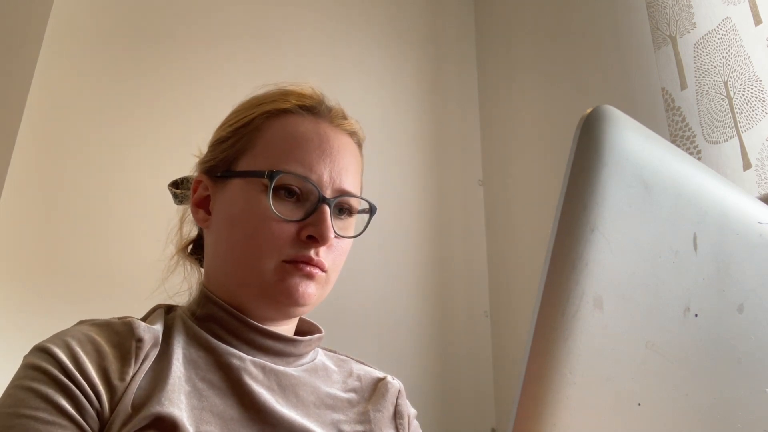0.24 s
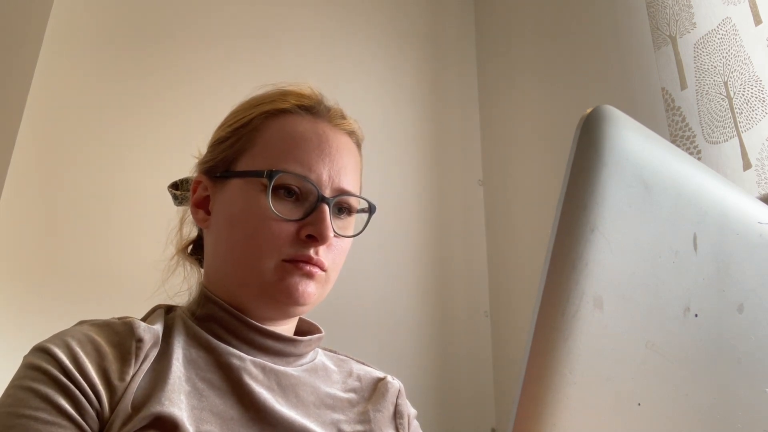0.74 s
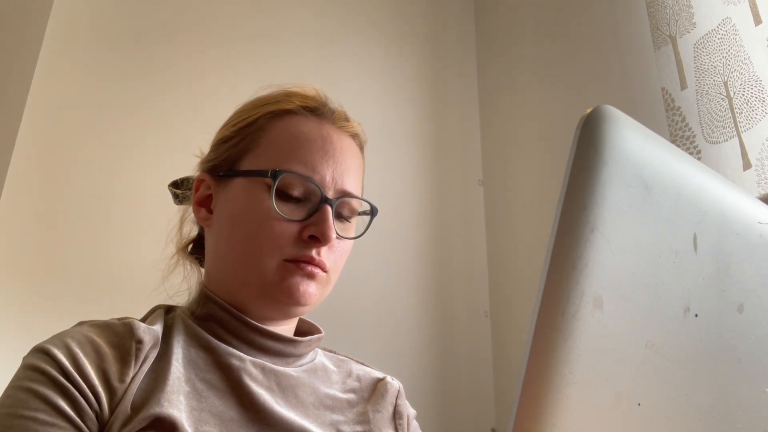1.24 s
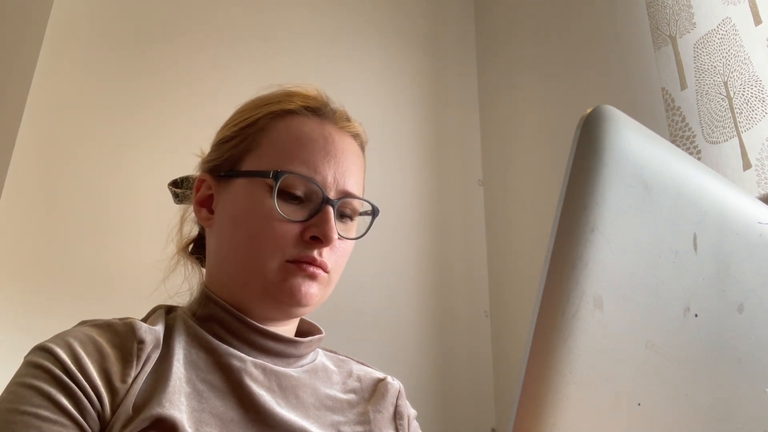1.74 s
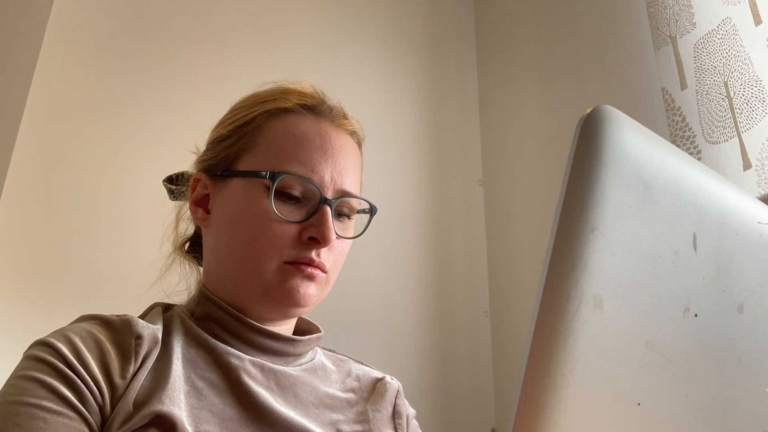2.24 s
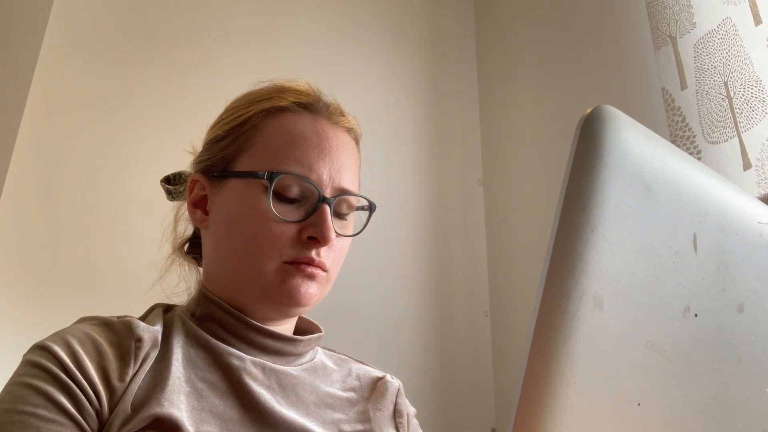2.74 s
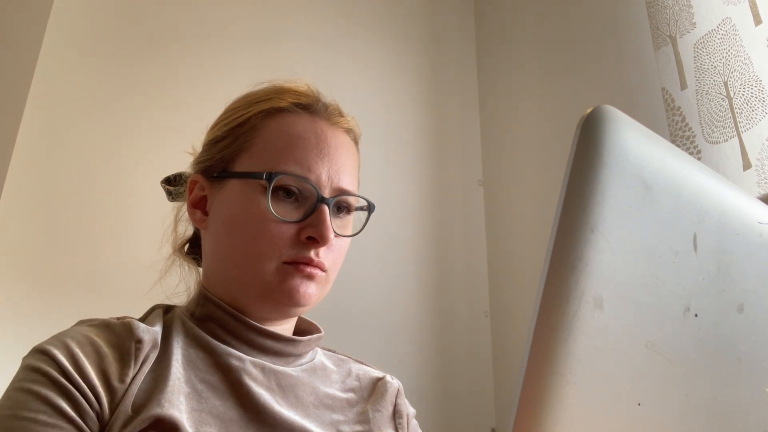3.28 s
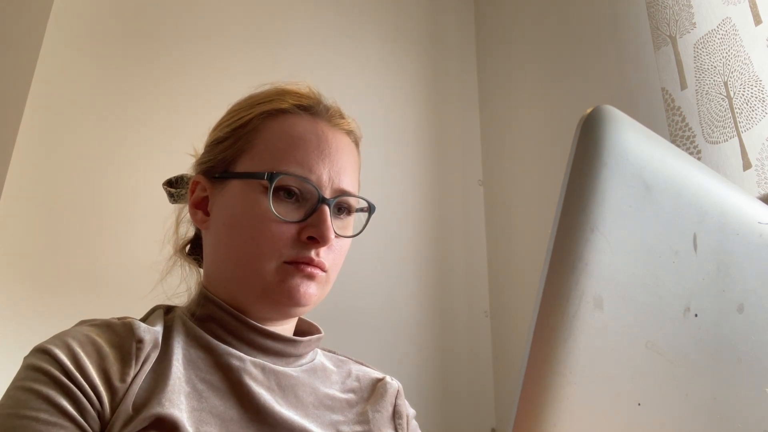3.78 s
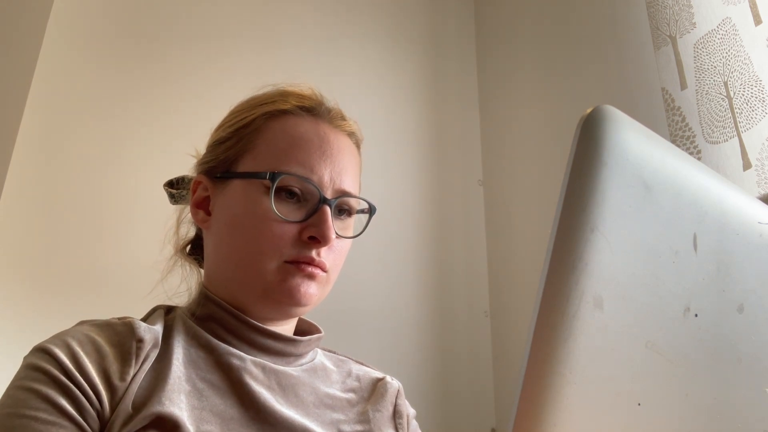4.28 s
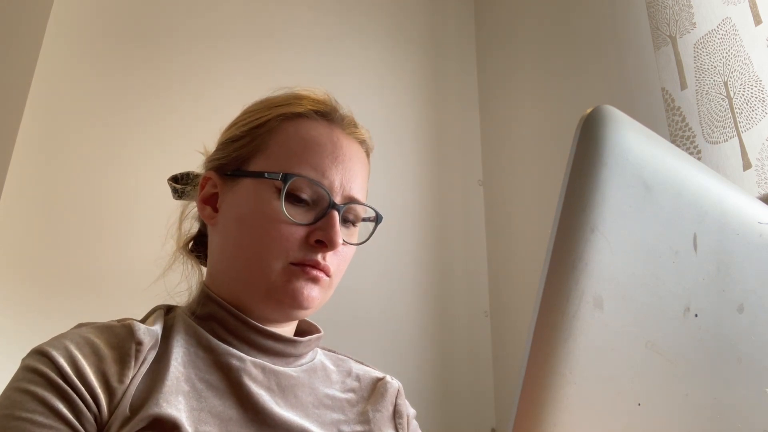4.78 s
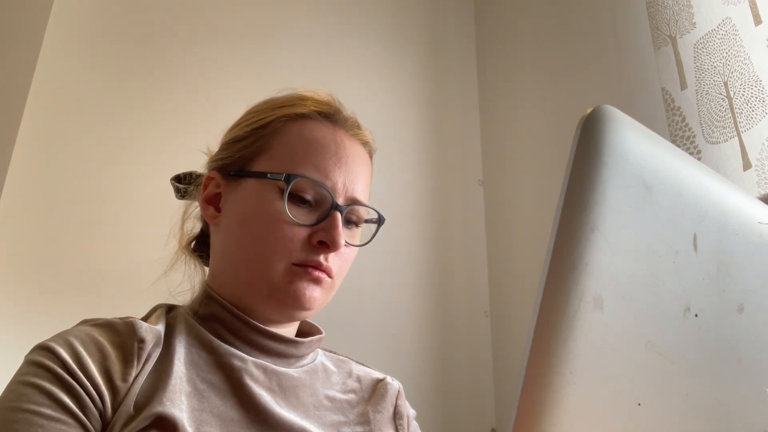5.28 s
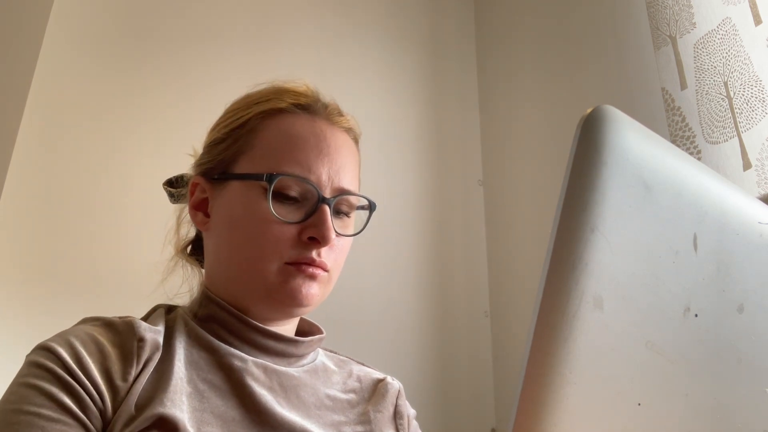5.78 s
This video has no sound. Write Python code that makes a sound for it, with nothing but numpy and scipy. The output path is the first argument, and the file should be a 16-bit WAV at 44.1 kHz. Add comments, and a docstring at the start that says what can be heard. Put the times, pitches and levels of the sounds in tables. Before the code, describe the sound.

A small quiet room with faint low air noise, heard close and in mono. From the start, light crisp laptop key clicks run quickly, about twelve to fifteen a second, uneven in strength. Around 1.05 s there is a small gap, then firmer, more spaced clicks from 1.3 s, with a sharper stroke and brief rattle at 1.93 s and a tight hollow-sounding flurry until 2.5 s. Typing pauses, leaving only room air and slight hand rumble, until about 3.2 s. A lighter, regular run follows to 4.3 s. A short finger scuff at 4.4 s leads to the loudest moment: hard strokes thudding the case at 4.65 and 4.74 s, another with a rattle at 4.93 s. Softer sparse clicks follow, then scuffs near 5.6 s, a firm stroke at 5.7 s and quick clicks to the end at 6 s.

```python
"""In a small quiet room, quick runs of typing on a laptop, with a pause and a few hard strokes.
Each click is a short noise burst filtered by the resonances of its cap, then reflections and a diffuse tail.
Keys meeting their stops excite decaying case modes, most strongly in the hard strokes; soft bumps swing low.
Loose caps rattle and fingers scuff as unevenly modulated noise; moving hands rumble under still room air."""
import sys
import numpy as np
from scipy import signal
from scipy.fft import rfft, irfft, next_fast_len
from scipy.io import wavfile

SR = 44100
rng = np.random.default_rng(int(sys.argv[2]) if len(sys.argv) > 2 else 0)


def generate_wav(signal):
    """Clip the signal to [-1, 1] and save it as 16-bit WAV at the path in sys.argv[1]."""
    frames = np.transpose(np.atleast_2d(signal))
    scaled = np.clip(frames, -1, 1) * 32767
    pcm = np.round(scaled).astype(np.int16)
    wavfile.write(sys.argv[1], SR, pcm)


N = 265461   # samples in the scene
LENGTH = 12288   # samples in one impact
AGE = np.arange(LENGTH) / SR   # s since the impact began

# key clicks, levels relative:
# start_s, level_db, hollow_knock_db, top_end_db, cap_ring_hz, deck_thud_db, contact_decay_s
KEY_CLICKS = [(0.0004, -28.5, -20.5, -24, 6780, -48.5, 0.0013), (0.0588, -30.5, -14, -26, 4430, -56, 0.003),
              (0.174, -33, -26, -20.5, 6100, -60, 0.0016), (0.2272, -30.5, -26, -25, 5800, -57, 0.0015),
              (0.2887, -32, -13, -17, 4500, -37, 0.0025), (0.3757, -26.5, -22, -27, 6570, -42.5, 0.0026),
              (0.5229, -26, -20.5, -24, 6670, -42, 0.0018), (0.5935, -34.5, -9.5, -28, 4400, -50, 0.0023),
              (0.6695, -25.5, -29, -23.5, 6820, -41.5, 0.0022), (0.7421, -32, -6, -19, 5830, -42, 0.0041),
              (0.819, -24.5, -19, -18, 6800, -32, 0.0012), (0.877, -33, -36, -18, 6900, -46, 0.0018),
              (0.8973, -29, -9, -15.5, 4600, -56, 0.0018), (0.9858, -23.5, -21.5, -28, 6530, -45, 0.0018),
              (1.036, -35, -30, -18, 6300, -51, 0.0012), (1.0519, -28, -7, -23, 6330, -45, 0.0025),
              (1.311, -22.5, -23, -16.5, 5470, -33, 0.00088),
              (1.4136, -20.5, -21, -13.5, 6470, -45, 0.0047), (1.585, -32, -29, -24, 4580, -44, 0.00092),
              (1.7217, -26, -36, -18.5, 7520, -38, 0.0016), (1.8152, -38.5, -11, -25, 8000, -44, 0.002),
              (1.9274, -20.5, -8.5, -16, 5880, -32, 0.0018), (2.021, -27.5, -12.5, -10, 5500, -44, 0.0029),
              (2.045, -29, -5.5, -11, 6400, -51, 0.0024), (2.0869, -30, -7.5, -19, 3900, -42, 0.0018),
              (2.2093, -29.5, -5, -13.5, 4330, -57, 0.0012), (2.2935, -38, -8, -25, 7600, -51, 0.0027),
              (2.3526, -22.5, -6, -18, 5500, -34, 0.0018), (2.4672, -41.5, -10, -17, 5740, -48, 0.0023),
              (2.4775, -36.5, -13, -31, 6040, -48, 0.0024), (3.1996, -46, -10, -24, 6840, -61, 0.0018),
              (3.2788, -24, -18, -19, 4750, -47, 0.001), (3.3364, -28, -26, -24, 4160, -51.5, 0.0018),
              (3.4055, -30, -15.5, -20, 4550, -57, 0.0013), (3.457, -24, -19, -26, 6350, -59, 0.0014),
              (3.4861, -27, -20, -20.5, 6730, -55, 0.0012), (3.5588, -27.5, -12.5, -22, 7270, -46, 0.0016),
              (3.6268, -31, -24, -23, 6750, -53, 0.0016), (3.7115, -30.5, -16.5, -25, 4350, -63, 0.002),
              (3.7743, -33.5, -32, -29, 6750, -45, 0.0015), (3.8467, -28.5, -15.5, -19, 4260, -58, 0.002),
              (3.922, -33, -26, -23, 4140, -50.5, 0.0014), (3.9966, -27.5, -13, -20.5, 5900, -56, 0.0021),
              (4.0307, -40, -24, -18, 4430, -72, 0.0018), (4.0982, -27, -21.5, -21, 4500, -66, 0.0024),
              (4.2107, -32, -37, -15.5, 4210, -49, 0.0013), (4.2949, -29.5, -12, -22, 4280, -47, 0.0029),
              (4.4476, -23.5, -15.5, -12, 5550, -46.5, 0.001), (4.5284, -25.5, -19, -17, 5560, -45, 0.0016),
              (4.6506, -32, 1, -25, 4140, -28, 0.0024), (4.6592, -27, -2, -22, 4330, -22, 0.0018),
              (4.7363, -27.5, 1.5, -31, 4640, -26, 0.0015), (4.8435, -36.5, -14, -10, 7830, -44, 0.0018),
              (4.9275, -22, -8, -12, 5620, -27, 0.0016), (4.986, -34.5, -18, -18, 5450, -42.5, 0.0021),
              (5.1595, -46.5, -13, -13, 6150, -51, 0.0025), (5.2609, -31, -9, -16, 4190, -45, 0.0011),
              (5.3588, -47.5, -3.5, -16, 7910, -65, 0.0018), (5.457, -35.5, -30, -20, 3900, -49.5, 0.0021),
              (5.5033, -36, -13, -43, 6640, -46, 0.0018), (5.5668, -33, -14, -39, 4480, -42, 0.0011),
              (5.6516, -29.5, -10.5, -23, 6100, -44, 0.0022), (5.6971, -23, -4.5, -22, 7530, -35, 0.0023),
              (5.7878, -31, -8, -27, 7300, -44, 0.0029), (5.842, -34.5, -11, -19, 6900, -55, 0.0015),
              (5.899, -28.5, -16.5, -21, 4510, -48, 0.0014), (5.9227, -27.5, -23, -28, 4550, -51, 0.0018),
              (5.9973, -37.5, -0.5, -40, 4440, -46, 0.0033)]
# hard strokes that shake the case, levels relative:
# start_s, level_db, bass_db, deck_knock_db, strongest_mode_hz, deck_pitch_hz
HARD_STROKES = [(1.723, -26.5, -11, -20.5, 241, 1010), (1.9274, -20, -30, -10, 380, 1070),
                (2.353, -20.5, -15, -10, 415, 990), (4.608, -26.5, -26, -41, 417, 1380),
                (4.653, -19.5, -28, -7.5, 485, 1170), (4.6612, -11.5, -24, -4, 260, 1266),
                (4.737, -13, -21, -3.5, 264, 1266), (4.9346, -15.5, -12, 0.5, 250, 1305),
                (5.506, -37.5, -6, 3.5, 490, 1290), (5.699, -23, -12, -4.5, 386, 1020),
                (5.793, -33.5, -26, 3.5, 394, 1160), (5.923, -29, -9, -15, 250, 1320)]
# relative spectrum of a key contact: frequency_hz, level_db
CLICK_SPECTRUM = [(150, -41), (450, -4), (800, -7), (1400, -1.5), (2100, -7), (3100, -8.5), (4400, -2.5),
                  (5000, -3.5), (6500, -3), (8000, -4.5), (10000, -8.5), (12000, -12.5), (14000, -11),
                  (16000, -17)]


def from_db(db):
    """Amplitude ratio: 20 dB is a factor of ten."""
    return 10 ** (np.asarray(db) / 20)


def unit(x):
    """Normalisation: the sum of squares, the signal energy, becomes one."""
    return x / np.sqrt(np.sum(x ** 2) + 1e-20)


def at_hz(points, hz):
    """Spectral interpolation: levels in dB run straight between points on a log-frequency axis."""
    point_hz, point_db = np.transpose(points)
    return np.interp(np.log(hz + 1), np.log(point_hz), point_db)


def colour(x, db_at):
    """Minimum-phase filtering: folding the cepstrum makes a causal filter of gain db_at(Hz)."""
    size = 2 * next_fast_len(len(x) // 2 + 2048)
    bin_hz = np.arange(size // 2 + 1) * SR / size
    cepstrum = irfft(np.log(from_db(db_at(bin_hz))))
    cepstrum[1:size // 2] *= 2
    cepstrum[size // 2 + 1:] = 0
    response = np.exp(rfft(cepstrum))
    return irfft(rfft(x, size) * response)[:len(x)]


def noise(spectrum):
    """Stationary noise: filtered white noise of the given spectral shape, rms one."""
    white = rng.standard_normal(N)
    return unit(colour(white, lambda hz: at_hz(spectrum, hz))) * np.sqrt(N)


def burst(decay_s, rise_s, uneven=0):
    """Impact noise: a swarm of tiny impacts swells and decays, a few standing out if uneven; energy one."""
    impacts = rng.standard_normal(LENGTH)
    impacts *= np.abs(impacts) ** max(uneven, 0)
    swell = 1 - np.exp(-AGE / rise_s)
    return unit(impacts * np.exp(-AGE / max(decay_s, 1e-4)) * swell)


def resonate(x, hz, width_hz):
    """Damped resonance: a pole pair sets pitch and bandwidth, with gain one at the peak."""
    radius = np.exp(-np.pi * width_hz / SR)
    zeros = np.array([1, 0, -1]) * (1 - radius * radius) / 2
    poles = [1, -2 * radius * np.cos(2 * np.pi * hz / SR), radius * radius]
    return signal.lfilter(zeros, poles, x)


def add(track, s, sound):
    """Superposition: pressures add from time s, cut at the ends of the track."""
    at = round(s * SR)
    sound, at = sound[max(-at, 0):], max(at, 0)
    part = sound[:max(len(track) - at, 0)]
    track[at:at + len(part)] += part


def room_tail(t60, rise_s):
    """Diffuse reverberation: freshly drawn noise falls by 60 dB in t60 seconds."""
    return burst(t60 / np.log(1000), rise_s)


def grit(per_s, size_db):
    """Contact roughness: random strengths, per_s a second, joined into an uneven gain of rms one."""
    t = np.arange(N) / SR
    sizes = from_db(size_db * rng.standard_normal(LENGTH * 2))
    return unit(np.interp(t * per_s, np.arange(len(sizes)), sizes)) * np.sqrt(N)


def still_air(level_db=-57.5):
    """Background noise: the still air of the room is a steady random pressure."""
    # relative spectrum of the room air: frequency_hz, level_db
    air_spectrum = [(25, -19), (55, -14), (75, -2), (115, -5), (170, -8), (280, -10), (400, -16),
                    (550, -21), (900, -25.5), (2000, -29.5), (4000, -30.5), (9000, -33.5), (14800, -35),
                    (16000, -35.5)]
    return from_db(level_db) * noise(air_spectrum)


def hands(level_db=0.0, rest_db=-55.0, fade=0.69, most_db=-47.5, push_db=-14.0, push_s=0.017):
    """Structure-borne excitation: moving hands shake laptop and desk in lumps; each click adds a push."""
    # effort of hands working on the deck, before fading and ceiling: time_s, effort_db
    work = [(0.0, -59), (0.69, -53), (0.89, -54.5), (1.41, -54.5), (1.94, -47.5), (2.21, -53), (2.55, -56),
            (2.88, -63), (3.13, -59.5), (3.49, -54.5), (3.75, -68), (4.22, -59), (4.83, -44), (5.0, -54.5),
            (5.26, -59.5), (5.52, -56), (5.7, -37), (6.02, -54)]
    # relative spectrum of the rumble: frequency_hz, level_db
    rumble_spectrum = [(20, -45), (35, -23.5), (68, -2), (100, -6.5), (125, -6), (160, -1.5), (205, 2.5),
                       (280, -3), (390, -4.5), (490, -10), (700, -19.5), (1000, -25), (1400, -37.5),
                       (2200, -47)]
    s, db = np.transpose(work)
    effort_db = np.interp(np.arange(N) / SR, s, db)
    # below rest_db the rumble falls faster than the effort
    fade_db = fade * np.minimum(effort_db - rest_db, 0)
    level = from_db(np.minimum(level_db + effort_db + fade_db, most_db))
    pushes = np.zeros(N)
    for key_s, key_db, *_ in KEY_CLICKS:
        push = AGE / push_s * np.exp(-AGE / push_s)
        add(pushes, key_s, from_db(min(key_db, -30) + push_db) * push)
    # independent contributions add in power
    return np.hypot(level, pushes) * noise(rumble_spectrum) * grit(per_s=24, size_db=5.0)


def keycap(x, ring_hz, count=7, spread=0.56, width_hz=110):
    """Modal resonance: cap and scissor clip have a few narrow modes, different from click to click."""
    pitches = np.clip(ring_hz * np.exp(spread * rng.standard_normal(count)), 1500, 15000)
    return unit(sum(resonate(x, hz, width_hz) for hz in pitches))


def early_reflections(snap, count=6, first_db=-11.5, first_s=.003, span_s=.035, fade_db=11.0):
    """Early reflections: sparse, ever weaker copies of the snap return from nearby surfaces."""
    out = np.zeros(LENGTH)
    for share in (np.arange(count) + rng.random(count)) / count:
        reflection_db = first_db - fade_db * share
        add(out, first_s + share * span_s, from_db(reflection_db) * rng.choice([-1, 1]) * snap)
    return out


def clicks(level_db=14.5, lead_s=0.01, lead_db=-5.5, lead_swell_s=0.0027,
           echo_s=.0105, echo_db=-7.5, echo_ring_db=-11.5, room_db=-0.5, room_t60=0.18,
           ring_db=-11.5, ring_t60=0.16, ring_width_hz=450, cap_db=-7.5, clip_db=-5.0,
           knock_ref_db=-16.5, top_ref_db=-21.0):
    """Impulsive excitation: the dome snaps, the cap rings, a near surface echoes and the room answers."""
    out = np.zeros(N)
    for s, db, knock_db, top_db, ring_hz, _, contact_s in KEY_CLICKS:
        contact = burst(contact_s, rise_s=0.00098, uneven=0.45)
        cap_ring = from_db(cap_db) * unit(resonate(contact, ring_hz, 460))
        snap = contact + cap_ring + from_db(clip_db) * keycap(contact, ring_hz)
        snap = snap + early_reflections(snap)

        echo = burst(0.0011, rise_s=0.002)
        echo_ring = unit(resonate(echo, ring_hz, 220))
        echo = from_db(echo_db) * echo + from_db(echo_ring_db) * echo_ring
        add(snap, echo_s + rng.normal(0, 0.00075), echo)

        snap += from_db(room_db) * room_tail(room_t60, rise_s=0.0011)
        ringing_tail = resonate(room_tail(ring_t60, rise_s=0.028), ring_hz, ring_width_hz)
        snap += from_db(ring_db) * unit(ringing_tail)

        # the cap scrapes in its guide around the moment the dome gives way
        scrape = rng.standard_normal(LENGTH) * np.exp(-np.abs(AGE - lead_s) / lead_swell_s)
        stroke = from_db(lead_db) * unit(scrape)
        add(stroke, lead_s, snap)

        # the finger's pad gives a hollow knock, its nail a bright top (Hz, dB)
        touch = [(1500, knock_db - knock_ref_db), (4200, 0.0017), (7500, 0.0055),
                 (11500, top_db - top_ref_db)]
        sound = colour(stroke, lambda hz: at_hz(CLICK_SPECTRUM, hz) + at_hz(touch, hz))
        add(out, s - lead_s, from_db(db + level_db) * sound)
    return out


def landings(above_thud_db=8.5, most_db=-37.5, bass_db=-14.5, knock_db=-18.5,
             body_hz=310, deck_hz=1222, spread=.15):
    """Soft impact: keys not struck hard meet their stops dully; rows as in HARD_STROKES."""
    # the spot, and with it the pitch, differs from key to key
    spots = np.exp(spread * rng.standard_normal((len(KEY_CLICKS), 2)))
    rows = []
    for (s, *_, thud_db, _), (body, deck) in zip(KEY_CLICKS, spots):
        # a click within 12 ms of a hard stroke belongs to it
        if all(abs(s - hard[0]) > .012 for hard in HARD_STROKES):
            level_db = min(thud_db + above_thud_db, most_db)
            rows.append((s, level_db, bass_db, knock_db, body_hz * body, deck_hz * deck))
    return rows


def thuds(level_db=-12.5, spread_db=2.5, detune=0.0094, swell_cycles=0.15, place_db=7.5,
          clack_db=6.5, clack_s=0.0013, wall_s=0.028, wall_db=-14.0, room_db=-14.5, room_t60=0.23,
          bass_ref_db=-15.0, knock_ref_db=-6.0):
    """Modal superposition: a key at its stop rings all case modes, favouring those that swing there."""
    # case and desk modes, nominal pitch and relative level: pitch_hz, level_db, t60_s
    case_modes = [(73.8, -14, 0.24), (118.8, -9.5, 0.25), (188, -3, 0.07), (246, 0, 0.052), (294, 2, 0.045),
                  (353.7, -5, 0.11), (398.3, -4, 0.091), (495.6, -2.5, 0.074), (622, -6, 0.067),
                  (768, -7.5, 0.061), (959, -10.5, 0.082), (920, -7, 0.012), (1230, -31, 0.048),
                  (1460, -13, 0.024), (1830, -8, 0.025), (2225, -13.5, 0.04), (2690, -8, 0.011)]
    out = np.zeros(N)
    hz, mode_db, t60 = np.transpose(case_modes)[:, :, None]
    signs = (-1) ** np.arange(len(case_modes))[:, None]   # neighbouring modes swing against each other
    for s, db, bass_db, knock_db, body_hz, deck_hz in HARD_STROKES + landings():
        # balance of the blow (Hz, dB)
        touch = [(130, bass_db - bass_ref_db), (240, 0.0082), (500, 0.0),
                 (1100, knock_db - knock_ref_db)]
        place = place_db * np.exp(-(np.log(hz / body_hz) / 0.16) ** 2)
        strength = from_db(mode_db + at_hz(touch, hz) + place + rng.normal(0, spread_db, hz.shape))
        # each mode's pitch varies slightly from thud to thud
        pitch = hz * (1 + rng.normal(0, detune, hz.shape))
        swell = 1 - np.exp(-AGE * hz / swell_cycles)   # low modes need longer to get going
        decay = np.exp(-np.log(1000) * AGE / t60)
        modes = signs * strength * swell * decay * np.sin(2 * np.pi * pitch * AGE)
        ring = np.sum(modes, axis=0)
        add(ring, wall_s, from_db(wall_db) * ring)   # a delayed reflection

        # the deck plate right under the key answers at once with a clack of a few cycles
        clack_swell = AGE / clack_s * np.exp(1 - AGE / clack_s)
        clack = clack_swell * np.sin(2 * np.pi * deck_hz * AGE)
        ring += from_db(clack_db + knock_db - knock_ref_db) * clack
        tail = room_tail(room_t60, rise_s=0.00098)
        ring += from_db(room_db) * signal.fftconvolve(ring, tail)[:LENGTH]
        add(out, s, from_db(db + level_db) * ring)
    return out


def rattles(room_db=-12.5, room_decay_s=0.033):
    """Intermittent contact: a loose cap or wide key chatters in its guide under a decaying envelope."""
    # rattles, level at onset before the room's share: start_s, level_db, decay_s
    chatter = [(0.179, -54.5, 0.048), (0.296, -52, 0.02), (0.448, -54, 0.02), (1.725, -51.5, 0.035),
               (1.817, -50, 0.012), (1.9272, -29, 0.0029), (2.029, -51, 0.011), (2.055, -43, 0.009),
               (2.3536, -33, 0.0022), (3.909, -54, 0.0024), (4.206, -50.5, 0.01), (4.261, -58, 0.029),
               (4.929, -28.5, 0.0089), (5.462, -53.5, 0.071), (5.571, -57, 0.056), (5.698, -33.5, 0.0082),
               (5.705, -41.5, 0.034), (5.786, -42.5, 0.026)]
    level = np.zeros(N)
    for s, db, decay_s in chatter:
        direct = np.exp(-AGE / decay_s)
        room = from_db(room_db) * np.exp(-AGE / room_decay_s)
        add(level, s, from_db(db) * (direct + room))
    return level * noise(CLICK_SPECTRUM) * grit(per_s=480, size_db=2.0)


def bumps(rise_s=0.0071, decay_s=0.016, level_db=3.0):
    """Damped oscillation: landing finger pads and wrists push the laptop through a few low swings."""
    # soft landings on the deck, levels relative: start_s, level_db, pitch_hz
    soft_landings = [(0.228, -41.5, 229), (0.383, -42, 261), (0.552, -38, 101), (0.775, -40.5, 266),
                     (1.026, -41, 208), (1.089, -39.5, 166), (1.619, -34, 208), (1.725, -36, 65.4),
                     (1.748, -32, 136), (1.867, -36, 114), (2.043, -33.5, 129), (2.11, -39, 120),
                     (2.231, -33, 127), (2.314, -37.5, 166), (2.361, -30, 123), (3.42, -41, 197),
                     (3.576, -42.5, 195), (3.78, -45, 233), (4.683, -33, 112), (4.945, -28, 121),
                     (5.657, -37.5, 175)]
    out = np.zeros(N)
    for s, db, hz in soft_landings:
        envelope = (1 - np.exp(-AGE / rise_s)) * np.exp(-AGE / decay_s)
        swing = envelope * np.sin(2 * np.pi * hz * AGE)
        add(out, s, from_db(db + level_db) * swing)
    return out


def scuffs():
    """Stick-slip friction: skin catches and slides over the caps and the deck sounds hollow under it."""
    # finger strokes over the caps, Gaussian in time: middle_s, level_db, half_length_s
    strokes = [(0.36, -65, 0.09), (0.73, -58, 0.11), (1.624, -60, 0.03), (1.715, -49.5, 0.01),
               (1.86, -56.5, 0.018), (2.205, -56, 0.04), (2.31, -56, 0.075), (4.394, -46, 0.012),
               (4.41, -41, 0.014), (4.618, -45.5, 0.024), (4.694, -59, 0.0074), (5.542, -50.5, 0.055),
               (5.593, -47, 0.011), (5.64, -47, 0.01), (5.945, -52.5, 0.031)]
    # relative spectrum of the friction: frequency_hz, level_db
    scuff_spectrum = [(200, -41), (500, 8.5), (850, -5), (1300, 8.5), (1550, -1), (2000, -9), (4500, -15.5),
                      (8000, -19.5), (16000, -66)]
    t = np.arange(N) / SR
    pressure = sum(from_db(db) * np.exp(-((t - s) / half_s) ** 2) for s, db, half_s in strokes)
    return pressure * noise(scuff_spectrum) * grit(per_s=490, size_db=-0.5)


def scene():
    """Linear superposition: typing sounds over the still air of the room, in one channel."""
    background = still_air() + hands()
    keys = clicks() + thuds() + rattles()
    touches = bumps() + scuffs()
    return (background + keys + touches)[None]


def record(dry):
    """Band limiting: a steep elliptic low-pass removes the top above 15.9 kHz."""
    low_pass = signal.ellip(10, .1, 70, 15900, fs=SR, output="sos")   # order, ripple dB, stop dB, Hz
    return signal.sosfilt(low_pass, dry)


dry = scene()
out = record(dry)
generate_wav(out)
```